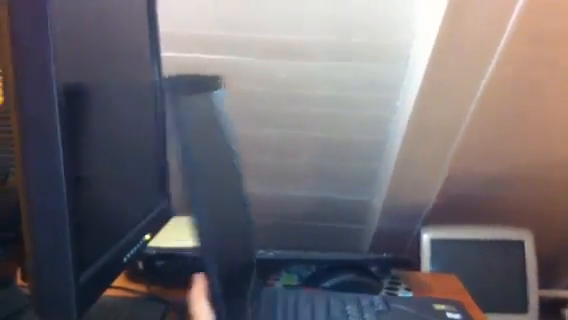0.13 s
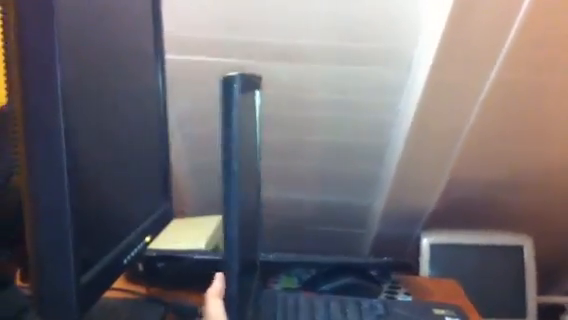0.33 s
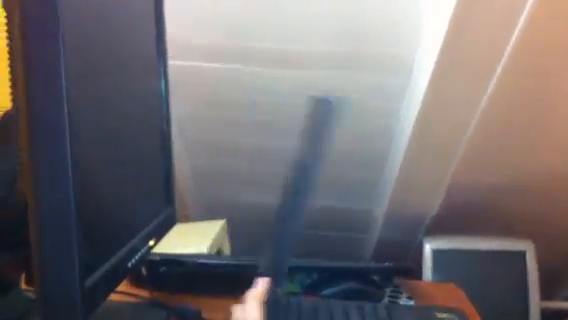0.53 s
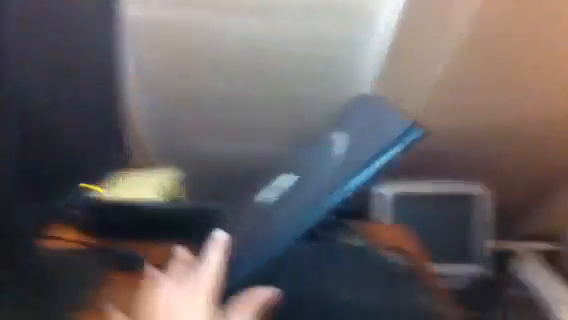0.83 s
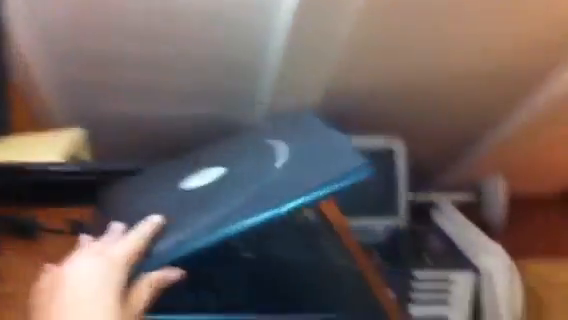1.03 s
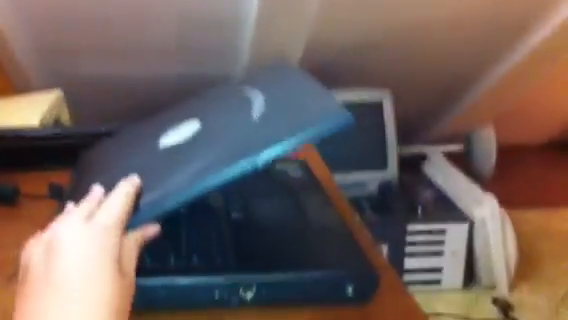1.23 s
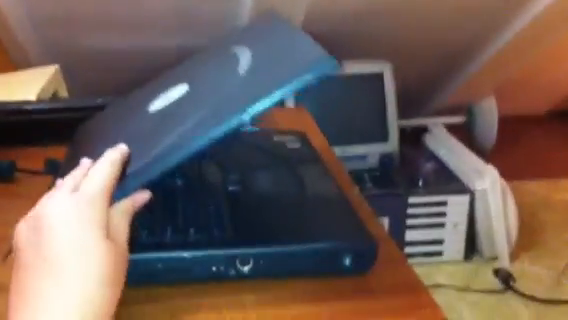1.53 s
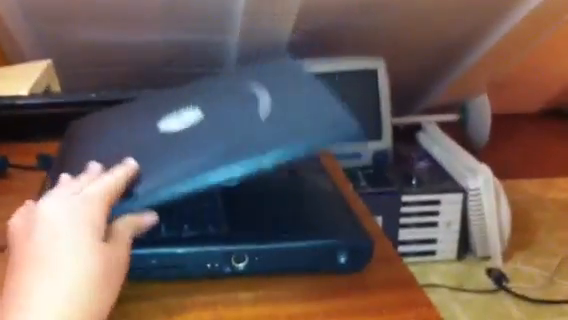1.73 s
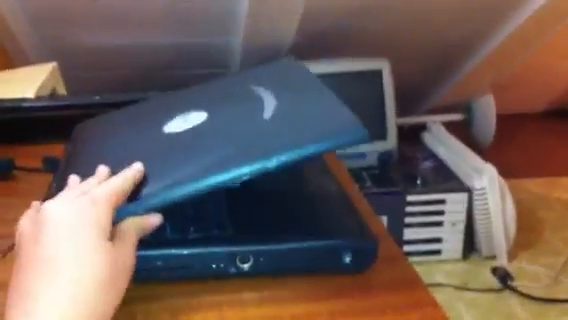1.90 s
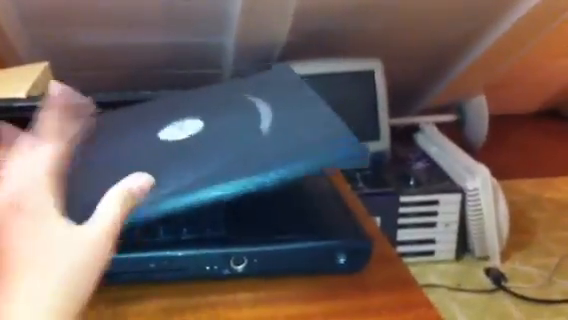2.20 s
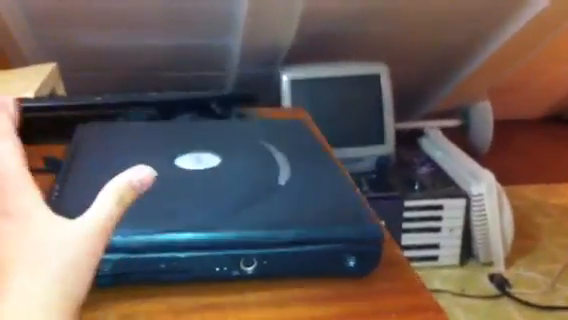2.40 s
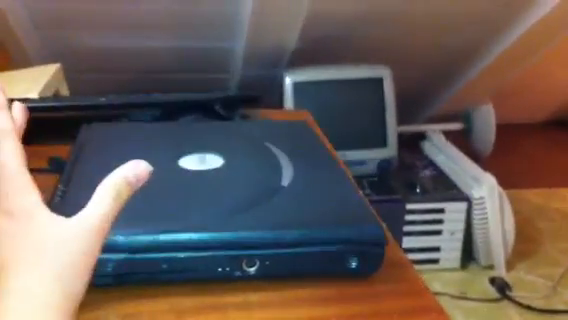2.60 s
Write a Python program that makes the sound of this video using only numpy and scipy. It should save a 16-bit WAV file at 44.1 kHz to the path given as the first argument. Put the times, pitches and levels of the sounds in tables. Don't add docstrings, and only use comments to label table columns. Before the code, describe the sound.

A laptop lid drops shut at about 2.45 s: a loud, sharp plastic clack made of very rapid cracks, with a low puff and short hollow ring. Before it, low computer burble and hiss carry soft knocks, hinge ticks and hand rubbing, busiest around 0.7 and 1.0-1.2 s, sparse until 2.2 s. Loose parts rattle until 2.65 s in a small room, closely miked.

```python
import sys
import numpy as np
from scipy import signal
from scipy.fft import rfft, irfft, next_fast_len
from scipy.io import wavfile
from scipy.ndimage import map_coordinates

SR = 44100
rng = np.random.default_rng(int(sys.argv[2]) if len(sys.argv) > 2 else 0)


def log_audio(samples):
    frames = np.atleast_2d(samples).T
    limited = np.clip(frames, -1, 1)
    pcm = np.round(limited * 32767).astype(np.int16)
    wavfile.write(sys.argv[1], SR, pcm)


def gain_from_db(level_db):
    decades = np.asarray(level_db, float) / 20
    return 10 ** decades


N = 121275


def unit(x):
    return x / np.sqrt(np.mean(x ** 2) + 1e-20)


def along(points, hz):
    f, v = np.transpose(points)
    return np.interp(np.log(hz + 1), np.log(f + 1), v)


def filtered(x, response):
    m = next_fast_len(len(x) + 8192)
    spectrum = rfft(x, m) * response(np.fft.rfftfreq(m, 1 / SR))
    return irfft(spectrum, m)[:len(x)]


def noise(colour, size=N):
    return unit(filtered(rng.standard_normal(size), lambda hz: gain_from_db(along(colour, hz))))


def wobble(rate_hz):
    knots = rng.standard_normal(int(N * rate_hz / SR) + 4)
    return map_coordinates(knots, [np.arange(N) * rate_hz / SR])


def pings(start_s, gain, hz, cycles):
    k = np.arange(SR // 12)
    turns = k / SR * hz[:, None]
    envelope = np.exp(-3 * turns / cycles) * (1 - np.exp(-turns / 0.7))
    wave = gain[:, None] * np.sin(2 * np.pi * turns) * envelope
    at = (start_s * SR).astype(int)[:, None] + k
    return np.bincount(at.ravel(), wave.ravel(), N + len(k))[:N]


def room(x, start_s):
    # (frequency [Hz], t60 [s])
    decay = [(150, 0.55), (500, 0.31), (2000, 0.41), (6000, 0.43), (12000, 0.31), (16000, 0.21)]
    early_t60_s, early_db = 0.19, -13.5
    hz, t, z = signal.stft(rng.standard_normal(SR // 2), SR, nperseg=256)
    late = gain_from_db(-60 * t / along(decay, hz)[:, None])
    early = gain_from_db(early_db - 60 * t / early_t60_s)
    tail = signal.istft(z * (late + early), SR, nperseg=256)[1]
    wet = signal.fftconvolve(x, tail / np.linalg.norm(tail))
    return np.pad(wet, (round(start_s * SR) + 150, N))[:N]


def machines():
    # (time [s], level [dB])
    burble = [(0, -56.5), (.3, -60.5), (.42, -56), (.5, -60.5), (.66, -55.5), (.8, -57), (.86, -58),
              (1.1, -56), (1.201, -56), (1.4, -57), (1.57, -60), (1.62, -63), (1.68, -59.5), (1.78, -56.5),
              (1.86, -56), (1.91, -59), (2.0, -58), (2.4, -60)]
    # (frequency [Hz], density [dB per Hz])
    burble_colour = [(24, -88), (40, -69), (107, -9.5), (381, -4), (499, -6), (824, -10.5), (907, -11.5),
                     (1080, -11.5), (4000, -39.5), (5200, -87), (8800, -120)]
    hiss_colour = [(880, -11.5), (1500, -7), (2290, -10.5), (2500, -12.5), (2960, -12.5), (15800, -18.5)]
    rumble_colour = [(20, -22), (60, -12), (110, -9), (170, 1.5), (260, -8.5), (500, -66)]
    grains_per_s, grain_hz, grain_spread, grain_cycles = 450, 540, .45, 3.5
    grain_size_db, grain_share = 3.2, .38
    rumble_db, hiss_db = -73, -68.5
    whine_hz, whine_width_hz, whine_db = 15000, 60, -88

    count = int(grains_per_s * N / SR)
    start_s = rng.random(count) * (N - 1) / SR
    pitch, size = np.clip(rng.standard_normal((2, count)), -2, 2)
    hz = grain_hz * np.exp(grain_spread * pitch)
    grains = unit(pings(start_s, gain_from_db(grain_size_db * size), hz, grain_cycles))
    bed = noise(burble_colour) * gain_from_db(0.82 * wobble(24.74))
    mix = np.sqrt(grain_share) * grains + np.sqrt(1 - grain_share) * bed
    level_db = np.interp(np.arange(N) / SR, *np.transpose(burble))

    whine = unit(filtered(rng.standard_normal(N),
                          lambda f: np.exp(-((f - whine_hz) / whine_width_hz) ** 2)))
    out = gain_from_db(whine_db) * whine + gain_from_db(rumble_db) * noise(rumble_colour)
    out += gain_from_db(level_db + 1.0) * mix
    return out + gain_from_db(hiss_db + 0.2 * wobble(7.0)) * noise(hiss_colour)


def knocks():
    # (time [s], peak [dB], frequency [Hz])
    blips = [(0.086, -42.5, 1100), (0.11, -47, 471), (0.246, -50, 540), (0.466, -42.5, 605),
             (0.485, -46.5, 676), (0.623, -43.5, 510), (0.688, -37, 908), (0.696, -40, 650),
             (0.7235, -42, 734), (0.737, -49, 700), (0.815, -48, 450), (1.053, -42, 402), (1.08, -47, 378),
             (1.169, -40, 477), (1.182, -46, 426), (1.375, -41, 1075), (1.763, -64, 338), (1.845, -52, 500),
             (1.859, -58, 472), (2.166, -46.5, 373), (2.213, -49, 452), (2.262, -56, 340),
             (2.359, -48, 380)]
    # (time [s], peak [dB], frequency [Hz])
    thuds = [
        (1.036, -60, 111),
        (1.166, -48.5, 138.6),
        (1.187, -49, 197),
        (1.235, -54.5, 127),
        (2.273, -63, 90),
        (2.49, -52, 110),
    ]
    blip_cycles, thud_cycles = 7.1, 6.4
    overtone, overtone_db = 1.96, -8
    s, db, hz = np.transpose(blips)
    out = pings(s, 1.44 * gain_from_db(db), hz, blip_cycles)
    out += pings(s, 0.86 * gain_from_db(db + overtone_db), hz * overtone, blip_cycles)
    s, db, hz = np.transpose(thuds)
    return out + pings(s, 2.3 * gain_from_db(db), hz, thud_cycles)


def strokes(starts, rows):
    t = np.arange(N) / SR
    out = np.zeros(N)
    for s, (swell_s, hold_s, t60_s, db) in zip(starts, rows):
        fade_db = 60 * np.maximum(t - s - swell_s - hold_s, 0) / t60_s
        out += gain_from_db(db - fade_db) * np.clip((t - s) / swell_s, 0, 1)
    return out


def hand():
    slide_s = [
        0.87,
        1.03,
        1.14,
        2.27,
        2.64,
    ]
    # (swell [s], hold [s], fade t60 [s], level [dB])
    slides = [(0.072, 0.078, 0.48, -59), (0.0053, 0.096, 0.38, -60.5), (0.0097, 0.04, 0.24, -63),
              (0.015, 0.0044, 0.18, -52), (0.014, 0.02, 0.2, -63.5)]
    dull_s = [0.746, 1.195, 1.49, 1.537, 1.69, 1.835, 2.295, 0.14, 0.58, 1.3]
    # (swell [s], hold [s], fade t60 [s], level [dB])
    dull_slides = [(0.0024, 0.0071, 0.1, -70), (0.0069, 0.017, 0.27, -71), (0.0034, 0.0053, 0.086, -67.5),
                   (0.0028, 0.039, 0.26, -66.5), (0.0092, 0.032, 0.29, -71), (.006, .012, 0.092, -73),
                   (0.0089, 0.049, 0.35, -65), (0.056, 0.074, 0.26, -72), (0.044, .1, 0.23, -79.5),
                   (0.027, .08, .3, -81)]
    # (frequency [Hz], density [dB per Hz])
    slide_colour = [(470, -37), (800, -5.5), (1030, -0.5), (1120, -5.5), (2200, -10.5), (3710, -9),
                    (15800, -18.5)]
    dull_hz = 5700
    dull = unit(filtered(noise(slide_colour), lambda hz: 1 / (1 + (hz / dull_hz) ** 4)))
    rubbing = strokes(slide_s, slides) * noise(slide_colour) + strokes(dull_s, dull_slides) * dull
    roughness_db = 0.76 * wobble(60) + 1.2 * wobble(500)
    return gain_from_db(roughness_db) * rubbing


def ticks():
    # (time [s], peak [dB], centre [Hz], width [Hz])
    tick_rows = [(0.521, -59, 5300, 1200), (0.688, -55, 1600, 1800), (0.7476, -54.5, 1800, 2000),
                 (0.752, -50, 1500, 2500), (1.0364, -45.5, 6000, 14000), (1.038, -42.5, 5000, 12000),
                 (1.041, -41.5, 1500, 3000), (1.041, -41.5, 2600, 2500), (1.042, -55.5, 9000, 9000),
                 (1.053, -47, 2000, 3000), (1.111, -56, 13000, 5000), (1.117, -47, 5940, 5000),
                 (1.145, -46, 11100, 12000), (1.147, -44, 6200, 2500), (1.167, -37, 1300, 1590),
                 (1.176, -35, 900, 1400), (1.183, -54, 700, 900), (1.666, -47, 7400, 12100),
                 (1.817, -49, 4930, 5950), (2.166, -51.5, 800, 900), (2.212, -50, 900, 1000),
                 (2.216, -58, 7000, 8000), (2.261, -47, 1200, 1200), (2.283, -52, 7000, 14000),
                 (2.2883, -46.5, 6000, 16000), (2.29, -44.5, 2800, 2500), (2.485, -23, 1500, 2500),
                 (2.496, -31.5, 1000, 2000), (2.531, -34.5, 2000, 4000), (2.574, -36, 1700, 890),
                 (2.609, -43.5, 2500, 3000), (2.63, -43, 500, 600)]
    t60_s, wet_db = .022, -6
    snap = 5
    out, t = np.zeros(N), np.arange(SR // 20) / SR
    for s, db, hz, width_hz in tick_rows:
        burst = rng.standard_normal(len(t)) - snap * (t == t[4])
        band = unit(filtered(burst, lambda f: np.exp(-((f - hz) / width_hz) ** 2 * 2)))
        tick = gain_from_db(db - 6.5 - 60 * t / t60_s) * band
        out[round(s * SR):][:len(t)] += tick
        out += gain_from_db(wet_db) * room(tick, s)
    return out


def slam():
    # (time [s], level [dB])
    contacts = [(2.4372, -46), (2.4398, -27), (2.4415, -21.5), (2.4435, -18), (2.4447, -12.5),
                (2.4456, -12.5), (2.4471, -8), (2.4485, -12), (2.4497, -12), (2.4526, -16), (2.4555, -15),
                (2.466, -19), (2.471, -18)]
    # (frequency [Hz], density [dB per Hz])
    crack_colour = [(60, -38), (150, 0.5), (300, -7), (600, -4), (1050, -3.5), (3200, -3), (8500, -5),
                    (14500, -4)]
    # (frequency [Hz], level [dB], t60 [s])
    case_modes = [(154.4, -6, 0.22), (174.6, -10.5, 0.27), (223, -9.5, .2), (256, -4, .2),
                  (365, -14.5, 0.3), (387.7, -7, .2), (400, -2, .2), (605, -15, 0.24), (769, -10, 0.18),
                  (947, -2.5, 0.06), (1043, -3.5, 0.11), (1110, -4, 0.085), (1347, -9, 0.19)]
    # (frequency [Hz], level [dB], t60 [s])
    lid_modes = [(1540, -13.5, 0.17), (1650, -8, .12), (1850, -9, 0.22), (1956, -10.5, 0.16),
                 (2030, -5.5, 0.13), (2300, -8, 0.13), (3220, -6, .06), (3670, 1, 0.039), (4654, -1, 0.047),
                 (12530, 7, 0.035), (14100, 9, 0.028)]
    crack_t60_s, crack_wet_db = 0.018, -2
    snap_db, snap_s = 8.5, 0.00011
    blow_s, blow_db, blow_rise_s, ring_wet_db = 2.4452, -24, 0.0018, -13
    flutter_db, flutter_per_s = 1.8, 60
    push_s, push_db, push_hz, push_cycles = 2.444, -23, 45, 1.6

    out, t = np.zeros(N), np.arange(SR // 4) / SR
    for s, db in contacts:
        hiss = gain_from_db(-60 * t / crack_t60_s) * noise(crack_colour, size=len(t))
        snap = gain_from_db(snap_db) * (1 - t / snap_s) * np.exp(-t / snap_s)
        crack = gain_from_db(db - 7.0) * (hiss - snap)
        out[round(s * SR):][:len(t)] += crack
        out += gain_from_db(crack_wet_db) * room(crack, s)

    ring = np.zeros(len(t))
    for hz, db, t60_s in case_modes + lid_modes:
        flutter = flutter_db * wobble(flutter_per_s)[:len(t)]
        ring += gain_from_db(db - 60 * t / t60_s + flutter) * np.sin(2 * np.pi * (hz * t + rng.random()))
    ring *= gain_from_db(blow_db) * (1 - np.exp(-t / blow_rise_s))
    out[round(blow_s * SR):][:len(t)] += ring
    out += pings(np.array([push_s]), gain_from_db([push_db]), np.array([push_hz]), push_cycles)
    return out + gain_from_db(ring_wet_db) * room(ring, blow_s)


def scene():
    return (machines() + knocks() + hand() + ticks() + slam())[None]


def low_pass(x):
    return signal.sosfilt(signal.butter(12, 15990, fs=SR, output="sos"), x)


def record(dry):
    low_hz, top_hz, offset_db = 130, 15770, -82
    mute_from_s, mute_to_s = 2.4275, 2.437
    gap_from_s, gap_to_s, gap_low_hz, gap_high_hz = 2.2655, 2.276, 10000, 15000
    t = np.arange(N) / SR

    def response(hz):
        high_pass = 1j * hz / low_hz / (1 + 1j * hz / low_hz)
        return high_pass ** 2 * (hz < top_hz)

    mic = filtered(dry[0], response)
    gap = np.clip(np.minimum(t - gap_from_s, gap_to_s - t) * 1000, 0, .9)
    mic = mic - gap * filtered(mic, lambda hz: (hz > gap_low_hz) & (hz < gap_high_hz))
    keep = np.clip(np.maximum(mute_from_s - t, t - mute_to_s) * 500 + .5, 0, 1)
    mix = mic[None] * keep - gain_from_db(offset_db)
    return low_pass(mix)


dry = scene()
out = record(dry)
log_audio(out)
```